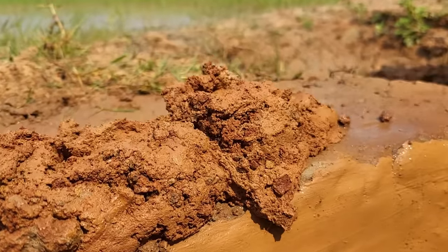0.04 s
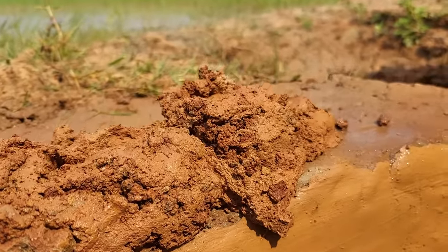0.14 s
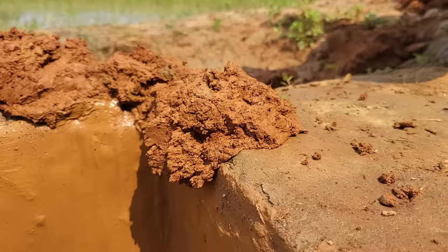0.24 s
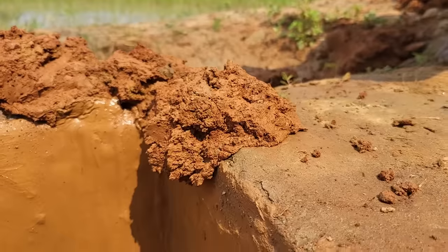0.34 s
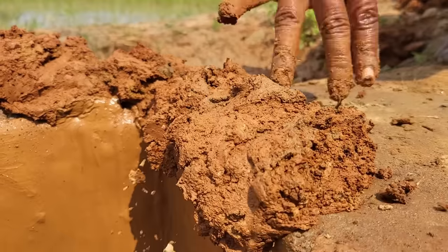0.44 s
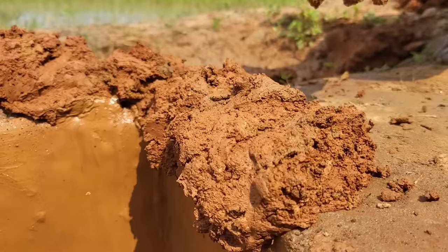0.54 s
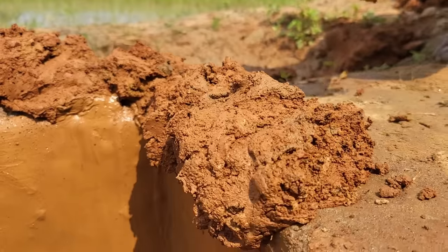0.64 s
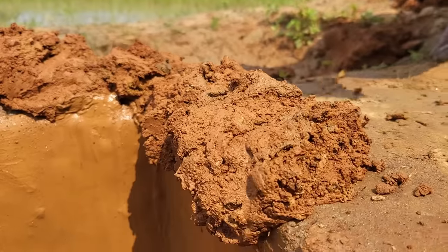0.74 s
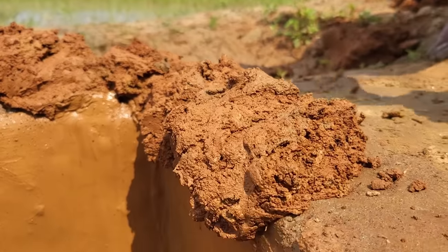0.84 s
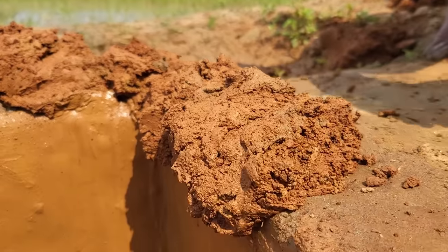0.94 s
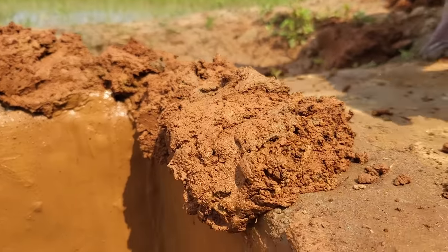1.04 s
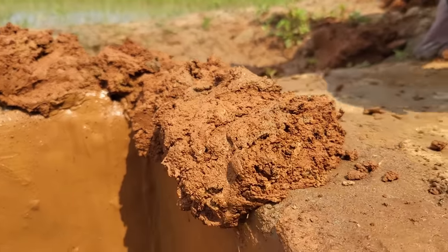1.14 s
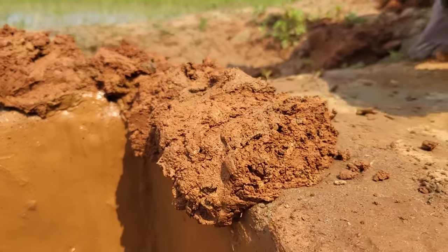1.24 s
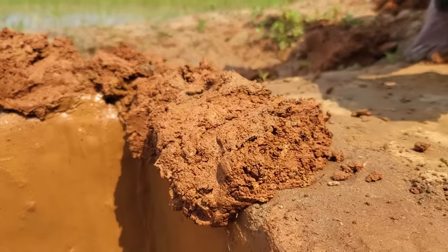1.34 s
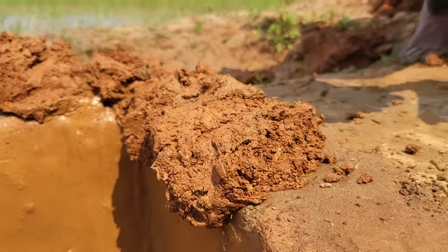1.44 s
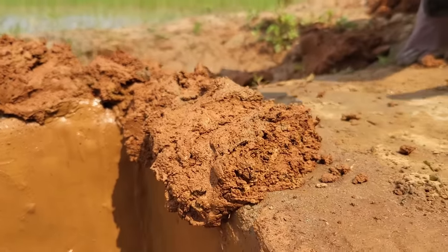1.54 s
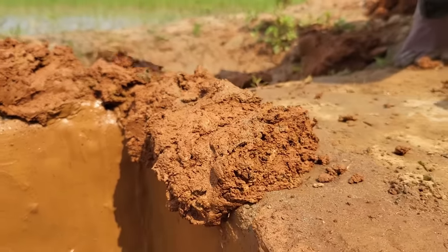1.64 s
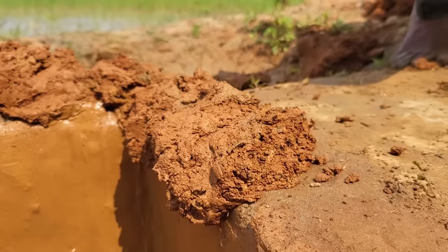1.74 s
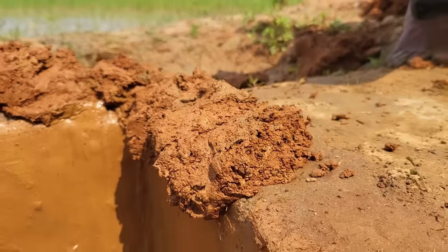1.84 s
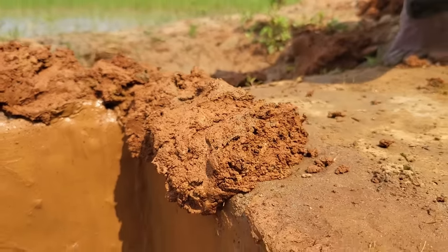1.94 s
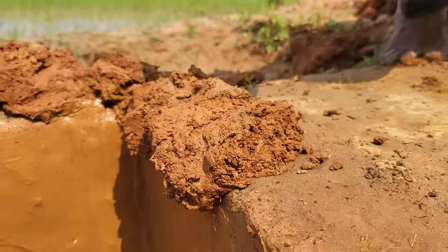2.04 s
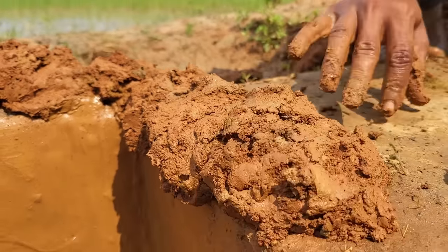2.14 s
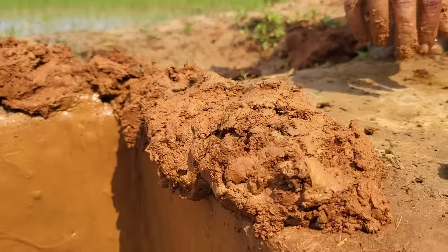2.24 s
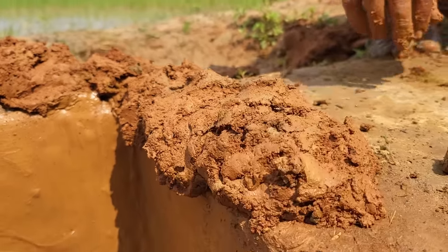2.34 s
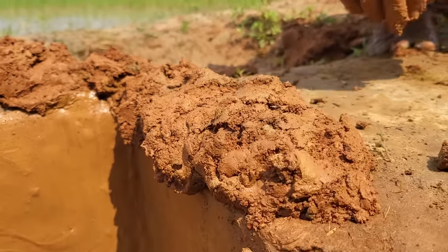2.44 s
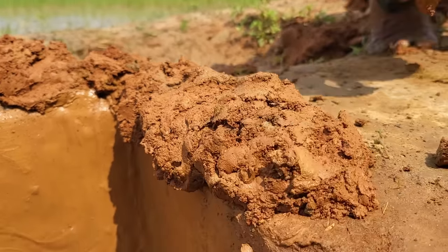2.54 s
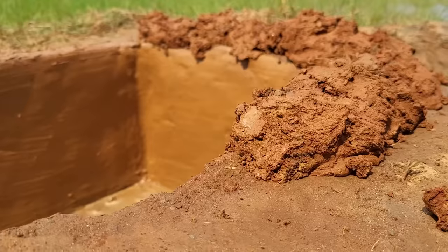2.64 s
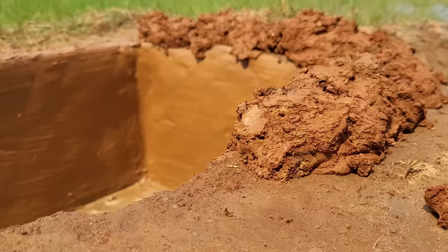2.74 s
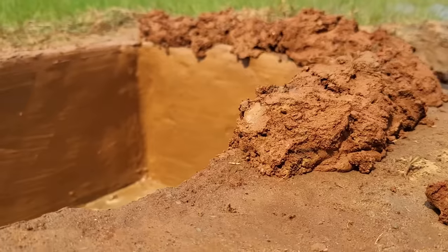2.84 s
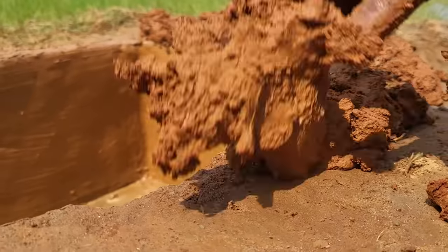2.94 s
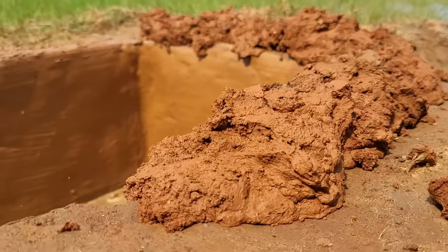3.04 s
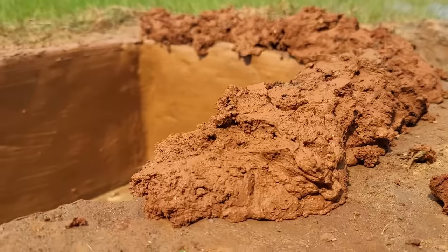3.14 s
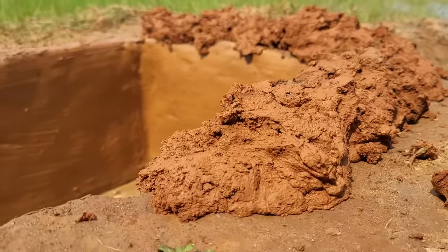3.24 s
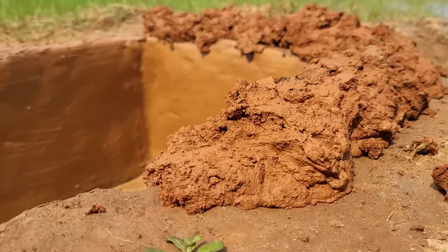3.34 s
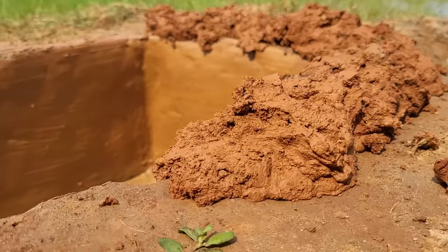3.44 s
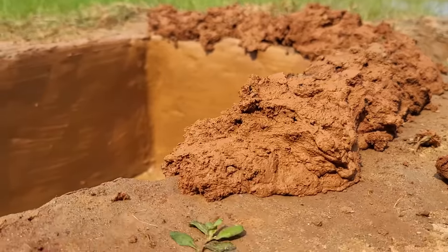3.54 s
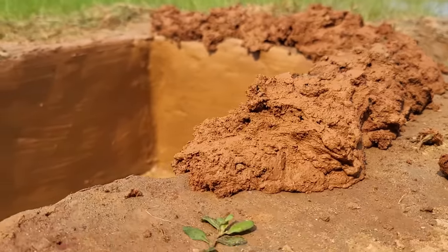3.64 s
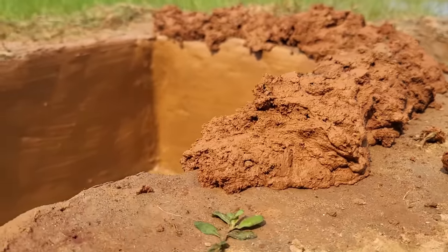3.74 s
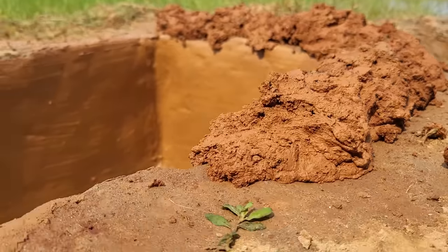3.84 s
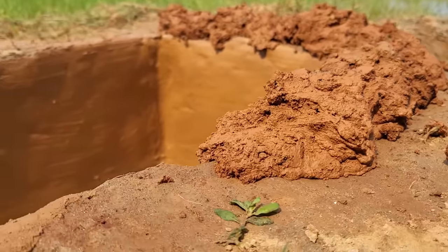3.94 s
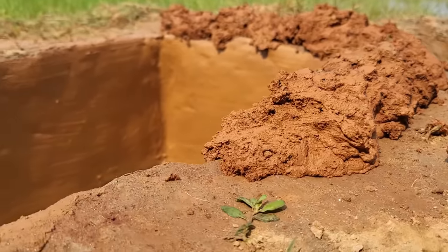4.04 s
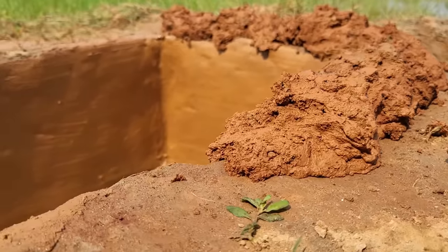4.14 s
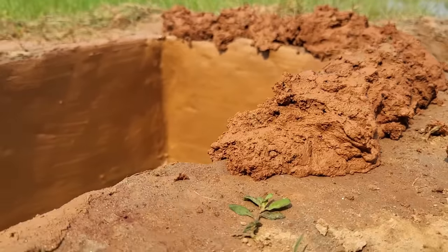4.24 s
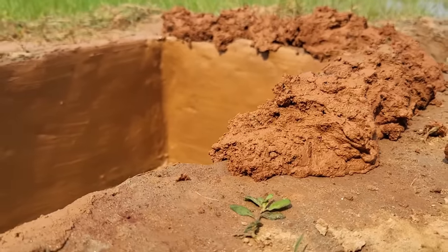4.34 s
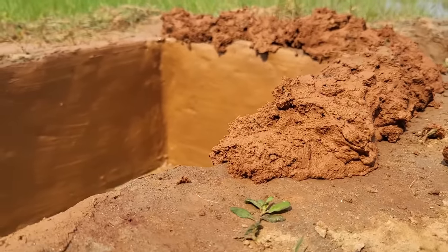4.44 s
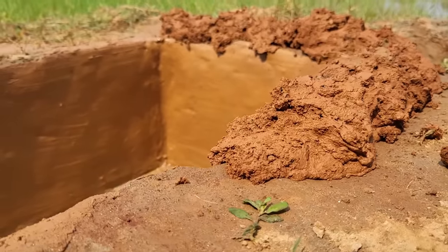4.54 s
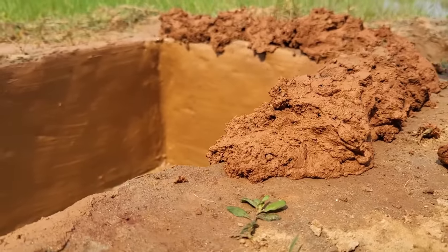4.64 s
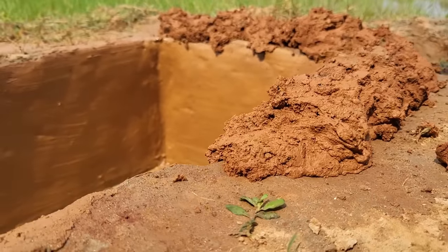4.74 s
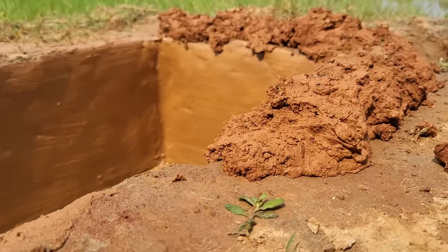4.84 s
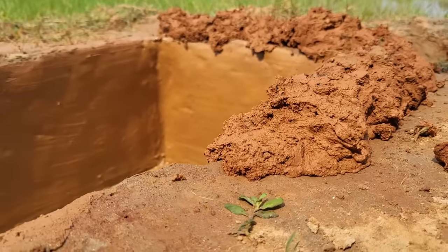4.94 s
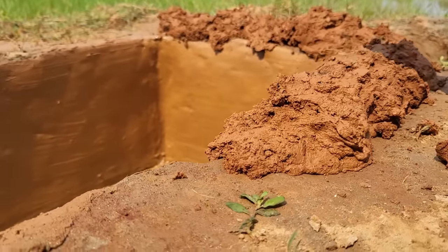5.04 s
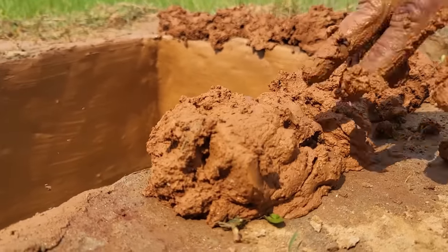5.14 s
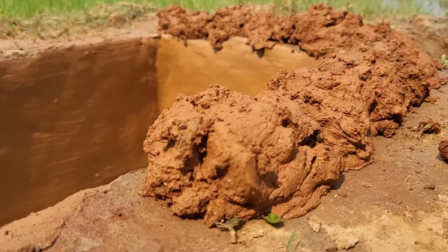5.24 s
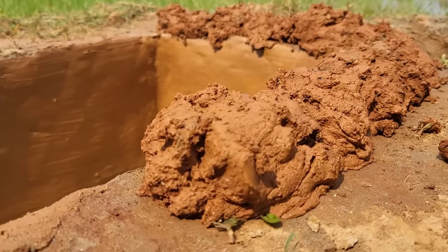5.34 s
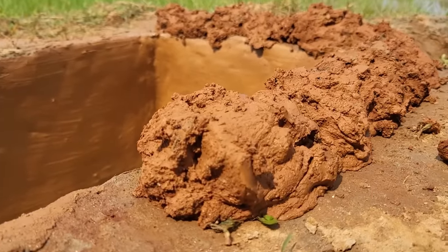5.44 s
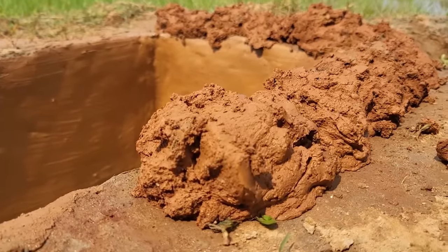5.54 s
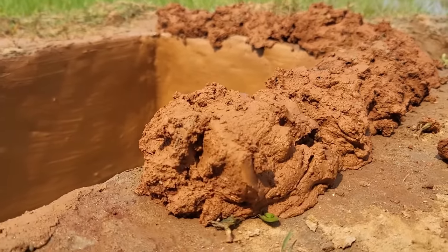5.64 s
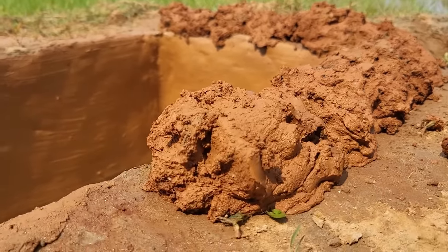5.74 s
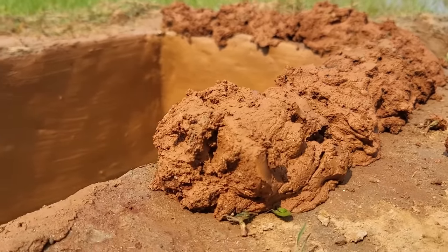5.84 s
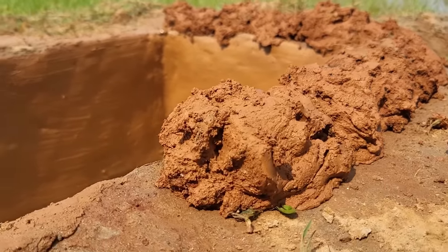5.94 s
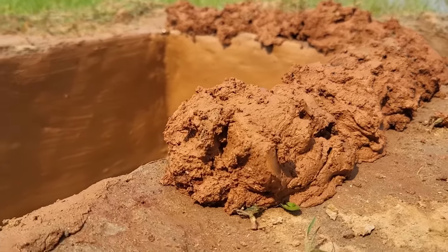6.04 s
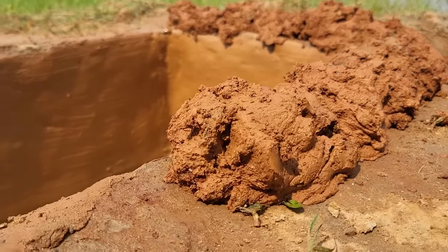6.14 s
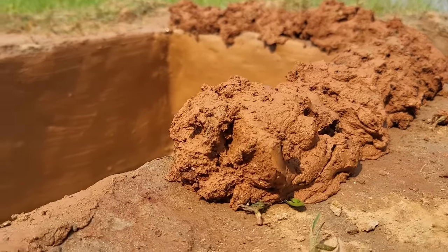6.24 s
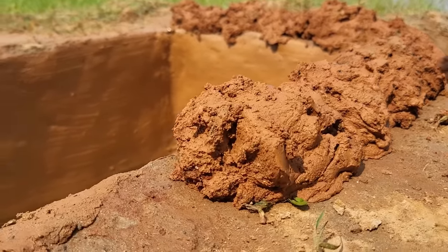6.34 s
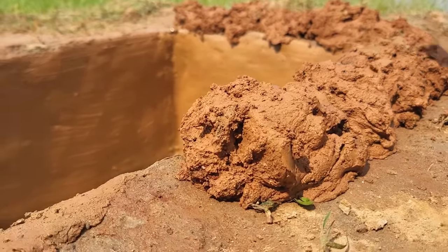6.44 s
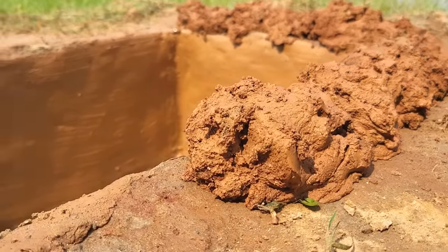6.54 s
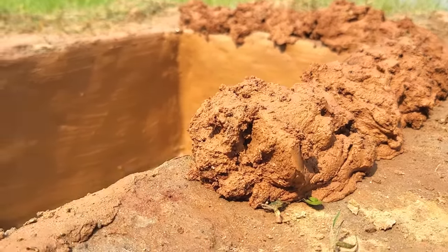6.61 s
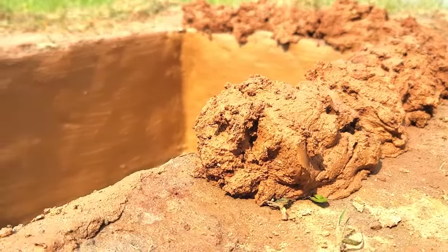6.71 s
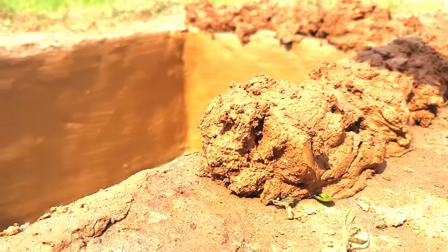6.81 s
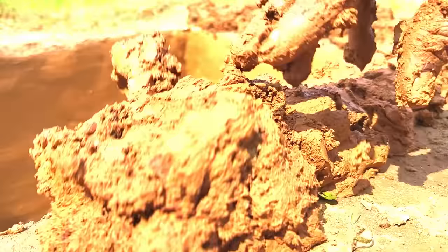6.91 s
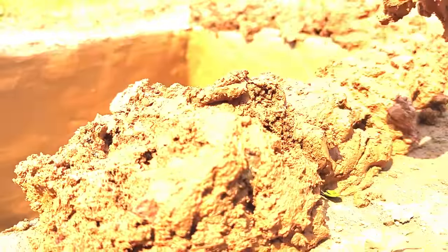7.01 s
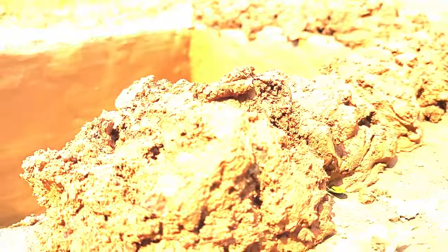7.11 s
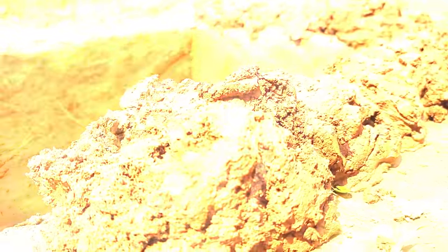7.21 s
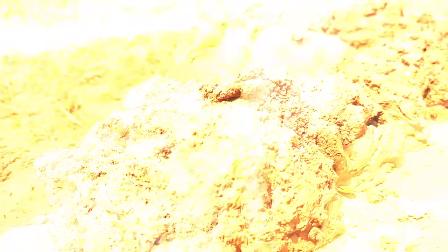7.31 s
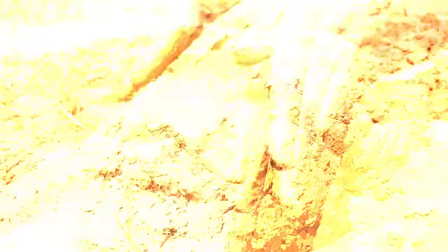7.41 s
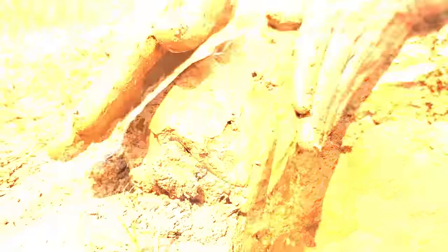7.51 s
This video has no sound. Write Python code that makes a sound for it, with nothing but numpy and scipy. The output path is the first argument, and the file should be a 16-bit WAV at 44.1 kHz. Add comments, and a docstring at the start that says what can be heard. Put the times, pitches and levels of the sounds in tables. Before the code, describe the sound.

Five heavy lumps of wet clay smack down with sharp, hollow slaps outdoors, sticky squelching and kneading between them over a faint low rumble.

```python
"""Wet clay slapped onto a pit rim

Five lumps land outdoors, close to the microphone. Shaped noise makes each one squirt and crack; damped
tones make it thud, wobble and ring the pit. Between throws, hands squelch in the mud to the right:
grainy noise with pops and squirts. Far off, filtered noise rumbles, wavering sines make an engine and
gliding sines make a few birds. Short echoes and a diffuse tail place the clay and hands in the pit.
"""
import sys
import numpy as np
from scipy import signal
from scipy.fft import rfft, irfft
from scipy.io import wavfile
from scipy.ndimage import uniform_filter1d

SR = 44100
rng = np.random.default_rng(int(sys.argv[2]) if len(sys.argv) > 2 else 0)


def unload_audio(sound):
    """Save the sound as a 16-bit wav file, at the path given as the first command line argument."""
    columns = np.transpose(np.atleast_2d(sound))
    # keep every value between -1 and 1, then stretch to whole-number steps
    steps = np.round(np.clip(columns, -1, 1) * 32767)
    wavfile.write(sys.argv[1], SR, steps.astype(np.int16))


N = 333837
TIME = np.arange(N) / SR

# Far rumble and air hiss, as relative spectra. Each row: frequency in Hz, density in dB per Hz.
RUMBLE_COLOUR = [(12, -49.5), (22, -20.5), (43, -4), (66, -1), (85, 1.5), (120, -6.5), (190, -14.5),
                 (250, -24), (420, -31), (630, -37), (900, -49.5), (1500, -63)]
AIR_COLOUR = [(500, -8.5), (1000, 1.5), (2500, -1), (6000, -5.5), (16000, -2)]
# Slow level of the rumble. Each row: time in seconds, level in dB before the quick swells.
RUMBLE_LEVEL = [(0, -52), (.8, -54.5), (2.8, -52.5), (3.3, -59), (4.2, -53.5), (4.6, -56), (5.3, -56.5),
                (5.9, -51.5), (7.1, -60), (7.57, -54.5)]
GUST_DB = 1.2  # rms depth of the quick swells
# Likeness of the rumble at the two ports. Each row: frequency in Hz, likeness from 0 to 1.
RUMBLE_SAME = [(60, 1.0), (300, 0.6), (1400, 0.079)]
# Far engine orders. Each row: frequency in Hz, early level in dB, late level in dB.
ENGINE_ORDERS = [(80.2, -55.5, -66.5), (161.4, -61.5, -77), (193.5, -61, -71), (223, -77, -84),
                 (346, -81.5, -93)]
# Far birds. Each row: start in seconds, length in seconds, start Hz, end Hz, level in dB, pitch blur in Hz.
BIRD_CALLS = [(0.0, 0.14, 352, 388, -69, 8.3), (1.02, 0.14, 491, 446, -75.5, 44),
              (1.2, 0.15, 488, 440, -74, 19), (1.746, 0.17, 453, 368, -57.5, 2.2),
              (5.303, .12, 485, 418, -75.5, 16), (7.353, .08, 460, 461, -71, 21),
              (1.62, 0.078, 5160, 5000, -84, 310), (2.61, .06, 4620, 4770, -85, 170),
              (3.4, 0.052, 4700, 4440, -81.5, 250), (3.88, 0.12, 4770, 4730, -74.5, 600),
              (4.365, 0.088, 2700, 2800, -83.5, 250), (4.422, 0.083, 4040, 3910, -85.5, 280),
              (4.795, 0.22, 3700, 3600, -83.5, 430)]

# Soft dull bumps on the ground. Each row: centre in seconds, level in dB, pitch in Hz, spread in seconds.
GROUND_BUMPS = [(0.585, -48, 193.7, 0.04), (1.033, -59.5, 453, 0.016), (1.463, -49.5, 96.5, 0.037),
                (1.72, -41.5, 177, 0.018), (2.392, -49.5, 63, 0.052), (3.109, -49, 186, 0.014)]
# Relative spectrum of a bump. Each row: frequency in Hz, density in dB per Hz.
BUMP_COLOUR = [(20, -7.5), (120, 8.5), (600, -16), (1500, -24.5), (4000, -27), (9000, -43.0)]

# First echoes from the pit walls. Each row: delay in seconds, level in dB.
WALL_ECHOES = [(.0021, -20), (.0056, -18.5), (.0087, -15.5), (.0128, -18)]
# Scatter off the earth banks. Each row: frequency in Hz, 60 dB decay time in seconds.
BANK_DECAY = [(100, 0.23), (500, 0.084), (1800, .19), (4000, .135), (8000, 0.097), (15000, 0.027)]
# Likeness of close sounds at the two ports. Each row: frequency in Hz, likeness from 0 to 1.
NEAR_SAME = [(60, 0.087), (300, 0.63), (700, 0.38), (1400, 0.13), (3100, 0), (7000, 0.0095), (15000, 0)]

# Fingers grab the mud, squeeze and let go.
# Each row: start in seconds, hold in seconds, fizz effort in dB, suck effort in dB.
PRESSES = [(0.152, .008, -61.5, -71), (0.553, .068, -60, -61), (0.859, .03, -71, -92),
           (1.463, .045, -58.5, -85), (1.704, .01, -77, -64), (1.993, .01, -72, -83),
           (2.218, .005, -62, -64), (2.711, .006, -70, -62.5), (2.77, .02, -71.5, -73),
           (3.098, .01, -61, -61), (4.091, .035, -62.5, -69), (4.275, .075, -66, -72),
           (4.505, .06, -60.5, -69.5), (4.628, .018, -66.5, -74), (5.356, .075, -71, -83),
           (5.585, .165, -73, -85), (5.759, .055, -55.5, -64), (5.897, .125, -64, -71.5),
           (6.022, .058, -55.5, -60.5), (6.213, .014, -65, -59), (6.511, .04, -73.5, -82),
           (7.237, .01, -57, -67), (7.29, .085, -66.5, -84), (7.409, .045, -48, -42),
           (7.474, .11, -55.5, -52.5)]
ATTACK_S, RELEASE_S = .007, .017
GRAB_DB, GRAB_S = 0, 0.0021  # extra bite at the start of a press, and its decay
# A palm slides lightly over the clay.
# Each row: peak time in seconds, half length in seconds, fizz effort in dB, suck effort in dB.
RUBS = [(0.07, 0.088, -71, -85), (1.05, .025, -66.5, -88), (1.27, .22, -72, -78.5),
        (1.75, 0.13, -76.5, -79), (2.4, .07, -70, -65.5), (3.58, 0.12, -75, -84), (3.81, .08, -68, -68.5),
        (4.165, .04, -56, -56.5), (4.8, 0.22, -83, -86), (5.84, .06, -63.5, -74.5),
        (6.27, 0.064, -78.5, -84.5)]
SWISH_SUCK_DB, SWISH_DB_PER_S = -14, 339  # suck relative to fizz as a lump leaves the hand; rise to contact
SLUMP_FIZZ_DB, SLUMP_SUCK_DB, SLUMP_DB_PER_S = -68.5, -66.5, 95.5  # the landed lump settles: effort, fall
REST_DB = -92.5  # effort floor of the mud at rest
# Relative spectra of the kneading. Each row: frequency in Hz, density in dB per Hz.
FIZZ_COLOUR = [(1500, -41.5), (3500, -16), (4600, 0), (6500, -1), (8300, 5), (10500, -1.5), (13000, 3),
               (16000, -0.5)]
SUCK_COLOUR = [(200, -17.5), (600, -14.5), (1100, -21.5), (1750, -12), (2500, -5.5), (3800, -2),
               (5200, -0.5), (8000, -11), (10000, -26)]
# Sticky pops above the kneading. Each row: time in seconds, level in dB, pitch in Hz, left-right dB.
STICKY_POPS = [(0.161, -46, 7600, -16), (0.5634, -36.5, 11800, 5), (1.705, -46, 4190, 0),
               (2.226, -34, 8300, 0), (2.7192, -42, 6650, 2), (3.1047, -32, 3750, 12),
               (3.4845, -42, 8600, -13.5), (3.5582, -44.5, 14940, -15), (3.852, -40, 5020, -8.5),
               (4.1263, -34.5, 5430, -9.5), (4.152, -36.5, 5500, -15.5), (4.509, -32, 8400, -3),
               (5.451, -49, 12500, -16), (5.91, -28, 13600, -7.5), (6.0313, -30, 12900, -4),
               (6.2228, -39, 4230, -4.5), (6.8909, -33, 7430, 0), (7.2449, -39, 4370, 6.5),
               (7.415, -31, 3940, -1)]
RUSTLE_DB, RUSTLE_S = -21, 0.0058  # faint rustle around a pop: level, rise and decay
POP_S = 0.0022  # decay of a pop
# Relative spectrum of a pop. Each row: frequency in Hz, density in dB per Hz.
POP_COLOUR = [(300, -15), (1200, -26.5), (3500, -3.5), (8500, 2), (11000, 3.5), (16000, 9.5)]
# Water squirting between the fingers. Each row: centre in seconds, level in dB, gap pitch in Hz.
WATER_SQUIRTS = [(3.723, -50, 4700), (3.747, -59, 4960), (4.175, -59, 2880), (4.513, -57, 4820),
                 (4.553, -60.5, 4700), (7.428, -39, 4150), (7.4511, -32.5, 5300), (7.455, -49.5, 1820),
                 (7.502, -42, 2960)]
SQUIRT_S, GAP_DB, SQUIRT_SIDE_DB = 0.0026, 16.5, -12.5  # spread, boost at the gap pitch, left-right dB
SQUIRT_SAME = [(700, 1.0), (8000, 0.078)]  # Each row: frequency in Hz, left-right likeness from 0 to 1.

# The hollow under each lump knocks while the pit rings.
# Each row: start in seconds, knock in dB, knock pitch in Hz, decay in seconds, pit ring in dB.
HOLLOW_KNOCKS = [(0.4749, -16.5, 226.7, 0.0046, -28), (2.1403, -22, 439.7, 0.01, -22),
                 (2.9766, -24.5, 240, 0.0039, -26), (5.1384, -24.5, 266.7, 0.008, -54.5),
                 (6.9372, -19, 295, 0.0033, -26.5)]
# Air modes of the pit. Each row: frequency in Hz, relative level in dB, 60 dB decay time in seconds.
PIT_MODES = [(468, 0, .115), (576, -5, .12), (657, -8, .1), (791, -12, .11), (910, -18, .1),
             (1060, -19, .13), (1520, -25, .13), (1714, -19, .165), (1790, -19, .14), (1933, -19, .15),
             (2096, -22, .14), (2417, -20, .16)]
# The mass of each lump. Each row: time in seconds, push in dB, push pitch in Hz, wobble delay in seconds,
# wobble in dB, wobble pitch in Hz, wobble decay in seconds.
LUMP_THUDS = [(0.4768, -21, 135, 0.0099, -20.5, 73.4, 0.0056),
              (2.143, -18.5, 146, 0.0033, -19.5, 107.4, 0.0056),
              (2.9759, -31.5, 168, 0.0066, -21, 61.5, .006),
              (5.1408, -21.5, 125.6, .012, -26, 58.36, 0.0088),
              (6.935, -19, 130, 0.015, -33.5, 76.8, 0.0069)]
THUD_PORT_RAD = .38  # how far out of step each port hears the wobble; the push is half as far out
# Pinched air snaps sharply under a landing lump.
# Each row: time in seconds, peak in dB, pitch in Hz, half length in seconds.
AIR_SNAPS = [(0.4765, -11, 5600, .00018), (2.1415, -12, 2900, .00018), (2.9783, -4.5, 8100, .0004),
             (5.1478, -12, 6000, .00012), (6.9334, -12, 7200, .0003), (6.9404, -11, 700, .0007)]
# Air cracks out from under a landing lump. Each row: time in seconds, level in dB, spread in seconds,
# pocket pitch in Hz, pocket boost in dB, left-right dB.
AIR_BURSTS = [(0.474, -20, 0.00023, 5200, 2, -6.5), (0.4772, -15.5, 0.0015, 758.2, 15, 1.5),
              (0.4792, -22.5, 0.0016, 235, 10.5, -1.5), (2.1427, -15.5, 0.00029, 2800, 6, 0.5),
              (2.1439, -22, 0.00058, 820, 8.5, -3), (2.9662, -14.5, 0.00053, 5200, -0.5, -1),
              (2.9723, -24.5, 0.00035, 7000, 10, 12), (5.1398, -18, 0.00068, 7700, 6, 1),
              (5.1472, -13.5, 0.00054, 1170, 14.5, -2), (6.919, -22, 0.00083, 5000, 3.5, -0.5),
              (6.9322, -16.5, 0.0004, 7570, 31, -3.5), (6.9343, -20.5, 0.00089, 5140, 31, -2.5),
              (6.9404, -19, 0.0011, 640, 13.5, 7)]
BURST_SAME = [(700, 1.0), (8000, 0.18)]  # Each row: frequency in Hz, left-right likeness from 0 to 1.
# The throws. Each row: full contact in seconds, spray in dB, rise in dB per second, fall in dB per second,
# body tint in dB near 420 Hz, mid tint in dB near 2300 Hz, top tint in dB near 12 kHz, left-right dB,
# swish effort in dB.
THROWS = [(0.4767, -14, 2299, 1302, -4.5, -8.5, -1, -2.5, -51.5),
          (2.1422, -16, 1697.5, 1098.5, -4, 1, -4, 0, -59.5),
          (2.9729, -17, 2203.5, 849.5, -8, -8.5, -7, 0.5, -56),
          (5.1435, -18, 1694, 1305.5, 0, 0.5, 4, -1, -59), (6.93, -16, 1246, 1252, -0.5, 0, -1.5, 0, -47)]
# Wet clay smacking, as a relative spectrum. Each row: frequency in Hz, density in dB per Hz.
SMACK_COLOUR = [(60, -8.5), (200, 7), (330, 3), (600, 5.5), (900, -4), (1500, -2.5), (2900, 0.5),
                (4000, -2), (5300, -1), (8300, 0), (10300, -13), (16000, -7.5)]

# Brief dips in level. Each row: centre in seconds, half length in seconds.
LEVEL_DIPS = [(0.189, 0.017), (2.603, 0.016)]
EDGE_HZ = 15950  # top of the sound band


def amp(db):
    """Turns dB into a gain."""
    return 10 ** (np.asarray(db) / 20)


def evened(x):
    """Scales a sound to rms 1."""
    return x / np.sqrt(np.mean(x ** 2) + 1e-20)


def read(points, hz):
    """Reads a curve between its points on a log-frequency axis."""
    f, value = np.transpose(points)
    return np.interp(np.log(hz + 1), np.log(f + 1), value)


def add(mix, s, sound):
    """Mixes a sound in at time s."""
    part = mix[:, max(round(s * SR), 0):][:, :sound.shape[-1]]
    part += sound[..., :part.shape[1]]


def pan(db):
    """Left and right gains that differ by so many dB; positive leans left."""
    return amp(np.array([[db], [-db]]) / 2)


def hump(hz, centre_hz, octaves):
    """A bell on the log-frequency axis."""
    return np.exp(-.5 * (np.log2((hz + 1) / centre_hz) / octaves) ** 2)


def shaped(x, db_at, same=NEAR_SAME):
    """Colours two noises and makes them as alike as two close microphone ports hear them; rms 1."""
    hz = np.fft.rfftfreq(x.shape[1], 1 / SR)
    a, b = rfft(x)
    likeness = np.clip(read(same, hz), -1, 1)
    right = likeness * a + np.sqrt(1 - likeness ** 2) * b
    return evened(irfft(np.array([a, right]) * amp(db_at(hz)), x.shape[1]))


def white(count):
    """Two independent white noises."""
    return rng.standard_normal((2, count))


def drift(count, per_s):
    """A random wander of rms 1, with straight lines between per_s knots a second."""
    knots = rng.standard_normal(int(count / SR * per_s) + 2)
    return evened(np.interp(np.arange(count) / SR * per_s, np.arange(len(knots)), knots))


def crackle(count, per_s, spread_db, hiss):
    """Tiny films of mud snapping: clicks of very uneven size over a fine hiss."""
    size = amp(spread_db * np.minimum(rng.exponential(1, count), 4.5))
    size *= rng.random(count) < per_s / SR
    return evened(white(count) * size) + hiss * white(count)


def pocket_tint(hz, pocket_hz, boost_db, octaves):
    """The clay smack lifted at a pocket's own pitch and sloping away 5 dB an octave below it."""
    below = np.maximum(np.log2(pocket_hz / (hz + 1)), 0)
    return read(SMACK_COLOUR, hz) + boost_db * hump(hz, pocket_hz, octaves) - 5 * below


def outdoors():
    """Low rumble, thin air hiss and the wavering orders of a far engine, louder in the first seconds."""
    def rumble_tint(hz):
        return read(RUMBLE_COLOUR, hz) - 30 * np.maximum(np.log2((hz + 1) / 1500), 0)

    rumble = shaped(white(N), rumble_tint, RUMBLE_SAME)
    rumble *= amp(np.interp(TIME, *np.transpose(RUMBLE_LEVEL)) + GUST_DB * drift(N, 18))
    air = amp(-78.5) * shaped(white(N), lambda hz: read(AIR_COLOUR, hz))

    early = np.interp(TIME, [2.58, 2.62], [1, 0])
    engine_clock = np.cumsum(1 + .005 * drift(N, 4)) / SR  # the speed wavers by half a percent
    engine = np.zeros(N)
    for hz, early_db, late_db in ENGINE_ORDERS:
        level_db = late_db + (early_db - late_db) * early + 1.3 * drift(N, 6.9)
        engine += amp(level_db) * np.sqrt(2) * np.sin(2 * np.pi * hz * engine_clock)
    return rumble + air + engine


def birds():
    """Low hoots and thin chirps: gliding sines whose jittered pitch blurs them with distance."""
    out = np.zeros((2, N))
    for s, length, start_hz, end_hz, db, width_hz in BIRD_CALLS:
        count = int(length * SR)
        hz = np.linspace(start_hz, end_hz, count) + width_hz / 2 * drift(count, 2 * width_hz + 20)
        add(out, s, amp(db) * 2 * np.hanning(count) * np.sin(2 * np.pi * np.cumsum(hz) / SR))
    return out


def bumps():
    """Weight shifts on soft ground: dull noise swells and fades around a low pitch."""
    out, t = np.zeros((2, N)), np.arange(-8192, 8192) / SR
    for s, db, bump_hz, length in GROUND_BUMPS:
        dull = shaped(white(len(t)), lambda hz: 16 * hump(hz, bump_hz, 0.21) + read(BUMP_COLOUR, hz))
        add(out, s + t[0], amp(db) * dull * np.exp(-.5 * (t / length) ** 2))
    return out


def walls(x):
    """Dull first echoes from the pit walls hollow out the sound."""
    out = np.zeros((2, N))
    dull = signal.sosfilt(signal.butter(1, 4000, fs=SR, output="sos"), x)
    for delay, db in WALL_ECHOES:
        add(out, delay, amp(db) * dull)
    return out


def banks(x, wet_db):
    """A short diffuse tail from the ground and banks, the top treble dying first."""
    noise = shaped(white(SR // 3), lambda hz: -6 * hump(hz, 14000, 0.46))
    hz, t, z = signal.stft(noise, SR, nperseg=256)
    fading = z * amp(-60 * t / read(BANK_DECAY, hz)[:, None])
    tail = signal.istft(fading, SR, nperseg=256)[1]
    tail *= np.minimum(np.arange(tail.shape[1]) / SR / 0.0033, 1)  # soft start
    return amp(wet_db) * signal.fftconvolve(x, tail / np.linalg.norm(tail[0]), axes=1)[:, :N]


def cavities(x, depth_db):
    """Small holes open and close in the mud, each lifting a narrow band for some milliseconds."""
    z = signal.stft(x, SR, nperseg=256, noverlap=192)[2]
    patches = uniform_filter1d(rng.standard_normal(z.shape[1:]), size=5, axis=0)  # across frequency
    patches = evened(uniform_filter1d(patches, size=9, axis=1))  # across time
    lifted = z * evened(amp(depth_db * patches))
    return signal.istft(lifted, SR, nperseg=256, noverlap=192)[1][:, :N]


def effort():
    """Fizz and suck effort in dB: presses, rubs, and the swish and slump around each throw add as power."""
    power, t = np.full((2, N), amp(REST_DB) ** 2), np.arange(SR // 2) / SR
    for s, hold, *levels_db in PRESSES:
        grab = 1 + amp(GRAB_DB) * np.exp(-t / GRAB_S)
        release = np.exp(-np.maximum(t - hold, 0) / RELEASE_S)
        shape = np.minimum(t / ATTACK_S, 1) ** 2 * grab * release
        add(power, s, np.outer(amp(levels_db), shape) ** 2)
    for s, half, *levels_db in RUBS:
        stroke = np.exp(-np.minimum(((TIME - s) / half) ** 2, 20))
        power += np.outer(amp(levels_db) ** 2, stroke)
    for s, *_, swish_db in THROWS:
        lead = np.maximum(s - TIME, 0)  # seconds left before contact
        swish = (lead > 0) * amp(-SWISH_DB_PER_S * np.minimum(lead, 1))
        power += np.outer(amp([swish_db, swish_db + SWISH_SUCK_DB]), swish) ** 2
        slump = amp(-SLUMP_DB_PER_S * t)
        add(power, s, np.outer(amp([SLUMP_FIZZ_DB, SLUMP_SUCK_DB]), slump) ** 2)
    return 10 * np.log10(power)


def kneading():
    """Fingers tear and press the mud: a bright fizz and a lower sucking crackle; light touches mostly swish."""
    fizz_db, suck_db = effort()
    clumps = evened(amp(2.2 * drift(N, 110)))
    fine = evened(crackle(N, 4000, 3.7, .55)) * clumps
    coarse = evened(crackle(N, 2000, 4, .45)) * clumps
    # the harder the press, the more the smooth swish breaks into grains
    sticky = np.interp(np.maximum(fizz_db, suck_db), [-74, -58], [.25, 1])
    smooth = np.sqrt(1 - sticky ** 2)
    fine = sticky * fine + smooth * white(N)
    coarse = sticky * coarse + smooth * white(N)
    fizz = shaped(fine, lambda hz: read(FIZZ_COLOUR, hz)) * amp(fizz_db + 2.5) * pan(-9.5)
    suck = shaped(coarse, lambda hz: read(SUCK_COLOUR, hz)) * amp(suck_db - 0.33) * pan(-2)
    return cavities(fizz + suck, 2.8)


def pops():
    """A faint rustle rises, a noise burst breaks out at the pop's pitch with a tick in its onset, and both fade."""
    out, t = np.zeros((2, N)), np.arange(-1024, 2048) / SR
    rustle = amp(RUSTLE_DB) * np.exp(-abs(t) / RUSTLE_S)
    fade = rustle + np.clip(t / .0003, 0, 1) * np.exp(-abs(t) / POP_S)
    tick_t = t - .0005
    for s, db, pop_hz, side_db in STICKY_POPS:
        burst = shaped(white(len(t)), lambda hz: 7 * hump(hz, pop_hz, .25) + read(POP_COLOUR, hz))
        tick = np.cos(2 * np.pi * pop_hz * tick_t) * np.exp(-(tick_t * pop_hz / 1.2) ** 2)
        add(out, s + t[0], amp(db) * (amp(-5) * burst * fade + 0.45 * tick) * pan(side_db))
    return out


def squirts():
    """Water forced through a narrow gap swells and fades in milliseconds, hissing at the gap's pitch."""
    out, t = np.zeros((2, N)), np.arange(-1024, 1024) / SR
    swell = np.exp(-.5 * (t / SQUIRT_S) ** 2)
    swell_rms = np.sqrt(np.mean(swell ** 2))
    for s, db, gap_hz in WATER_SQUIRTS:
        jet = shaped(white(len(t)) * swell, lambda hz: pocket_tint(hz, gap_hz, GAP_DB, 0.26), SQUIRT_SAME)
        add(out, s + t[0], amp(db) * jet * swell_rms * pan(SQUIRT_SIDE_DB))
    return out


def knocks():
    """A short hollow knock, while the air between the pit walls rings on at its standing waves."""
    out, t = np.zeros((2, N)), np.arange(SR // 3) / SR
    onset = np.minimum(t / .001, 1)
    for s, knock_db, knock_hz, decay, pit_db in HOLLOW_KNOCKS:
        knock = amp(knock_db) * np.sin(2 * np.pi * knock_hz * t) * np.exp(-t / decay)
        ring = np.zeros((2, len(t)))
        for hz, db, t60 in PIT_MODES:
            phase = rng.normal(0, hz / 1000, (2, 1))  # the higher the mode, the less the ports agree
            ring += amp(db - 60 * t / t60) * np.sin(2 * np.pi * hz * t + phase)
        add(out, s, onset * (knock + amp(pit_db) * ring))
    return out


def thuds():
    """A push of displaced air, then the heap wobbles like jelly; the draught reaches each port out of step."""
    out, t = np.zeros((2, N)), np.arange(-1024, 8192) / SR
    ports = THUD_PORT_RAD * np.array([[-1], [1]])
    for s, push_db, push_hz, delay, wobble_db, wobble_hz, decay in LUMP_THUDS:
        push = np.cos(2 * np.pi * push_hz * t + ports / 2) * np.exp(-(t * push_hz / 0.51) ** 2)
        late = np.maximum(t - delay, 0)
        wobble_shape = late / decay * np.exp(1 - late / decay)  # peaks at 1, one decay after it starts
        wobble = np.sin(2 * np.pi * wobble_hz * late + ports) * wobble_shape
        add(out, s + t[0], amp(push_db) * push + amp(wobble_db) * wobble)
    return out


def snaps():
    """A pinched pocket of air rings for an instant."""
    out, t = np.zeros((2, N)), np.arange(-256, 256) / SR
    for s, db, hz, length in AIR_SNAPS:
        add(out, s + t[0], amp(db) * np.cos(2 * np.pi * hz * t) * np.exp(-(t / length) ** 2))
    return out


def bursts():
    """Trapped air breaks out in sharp cracks; a pocket sings at its own pitch and gives little below it."""
    out, t = np.zeros((2, N)), np.arange(-1024, 1024) / SR
    for s, db, length, pocket_hz, pocket_db, side_db in AIR_BURSTS:
        swell = np.exp(-.5 * (t / length) ** 2)
        swell_rms = np.sqrt(np.mean(swell ** 2))
        crack = shaped(white(len(t)) * swell, lambda hz: pocket_tint(hz, pocket_hz, pocket_db, .25), BURST_SAME)
        add(out, s + t[0], amp(db) * crack * swell_rms * pan(side_db))
    return out


def splats():
    """Water and air spray out ever faster as a lump flattens, then die away."""
    out, t = np.zeros((2, N)), np.arange(-2048, 4096) / SR
    for s, db, rise, fall, body_db, mid_db, top_db, side_db, _ in THROWS:
        def tint(hz):
            body = body_db * hump(hz, 420, .9)
            mid = mid_db * hump(hz, 2300, .6)
            top = top_db * hump(hz, 12000, 0.21)
            return read(SMACK_COLOUR, hz) + body + mid + top

        grains = white(len(t)) * amp(2.2 * drift(len(t), 1500))
        envelope = amp(db + np.minimum(rise * t, -fall * t))
        add(out, s + t[0], shaped(grains, tint) * envelope * pan(side_db))
    return out


def scene():
    """Clay sounds near the pit, over the open-air background."""
    background = outdoors() + birds() + bumps()
    hands = kneading() + pops()
    clay = cavities(splats(), 1.3) + bursts() + snaps() + squirts()
    space = walls(clay + hands) + banks(clay, -20) + banks(hands, -15.0)
    return background + hands + clay + space + thuds() + knocks()


def record(dry):
    """The microphone's bass roll-off, two brief dips in level, then the band limit."""
    thinned = signal.sosfiltfilt(signal.butter(2, 27, "high", fs=SR, output="sos"), dry)
    gain = np.ones(N)
    for s, half in LEVEL_DIPS:
        gain *= 1 - .97 * np.exp(-((TIME - s) / half) ** 4)
    band_limit = signal.firwin(511, EDGE_HZ, window=("kaiser", 9), fs=SR)
    return signal.oaconvolve(thinned * gain, band_limit[None], "same")


dry = scene()
out = record(dry)
unload_audio(out)
```